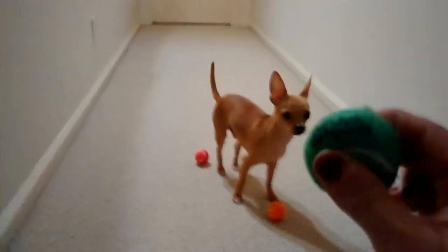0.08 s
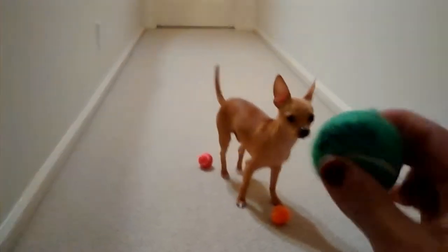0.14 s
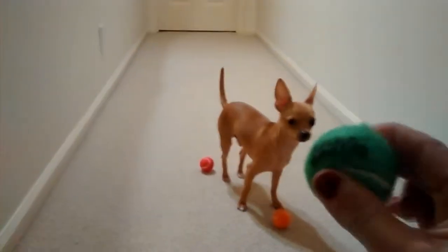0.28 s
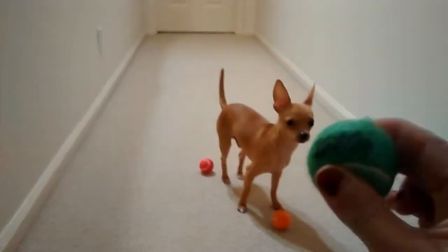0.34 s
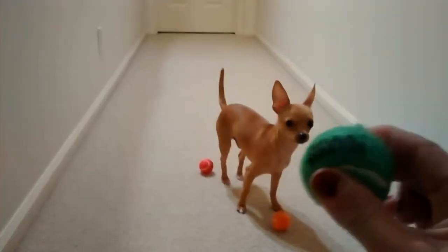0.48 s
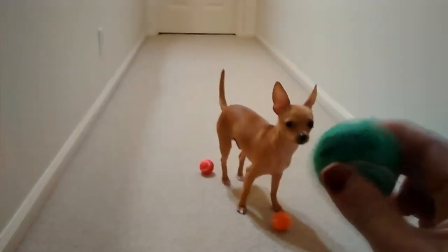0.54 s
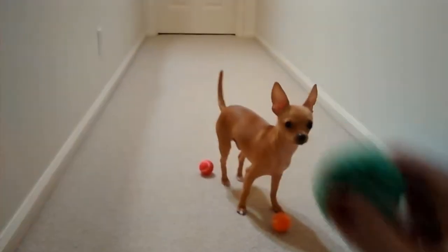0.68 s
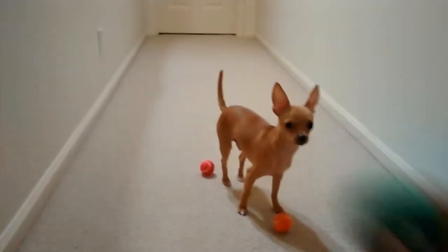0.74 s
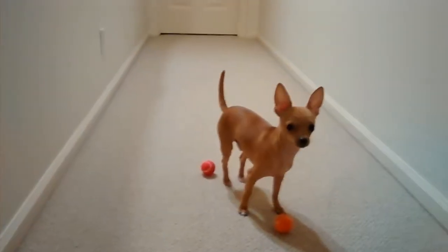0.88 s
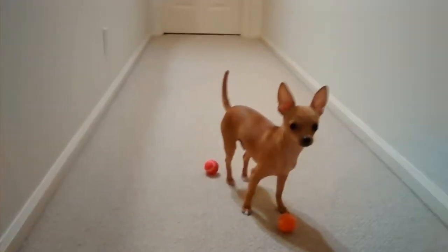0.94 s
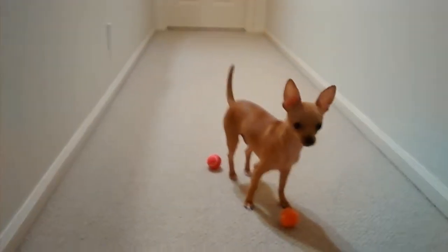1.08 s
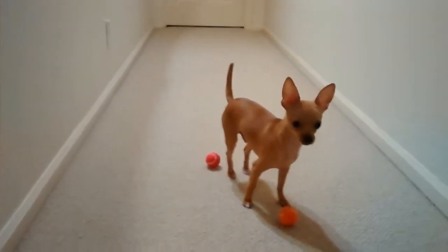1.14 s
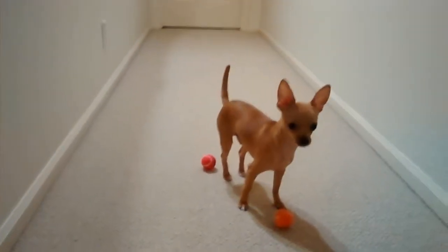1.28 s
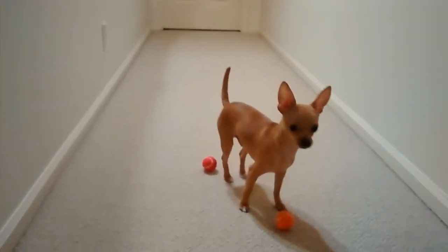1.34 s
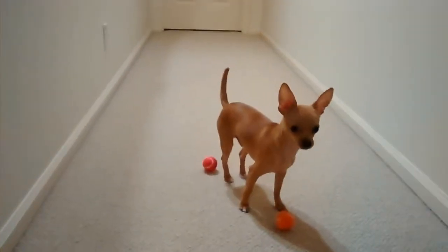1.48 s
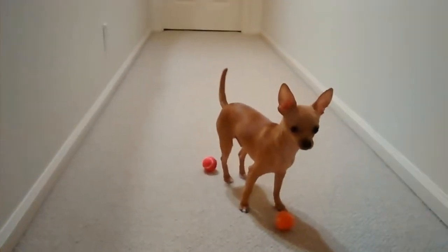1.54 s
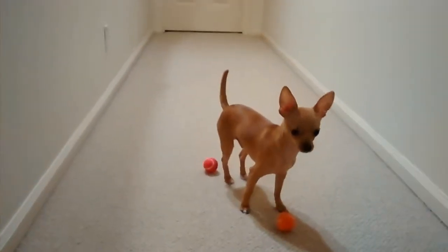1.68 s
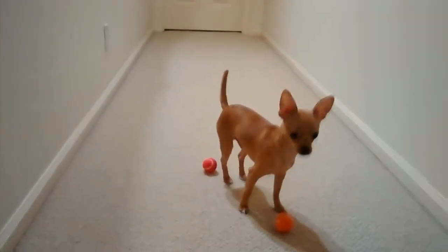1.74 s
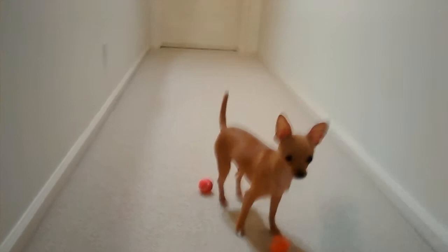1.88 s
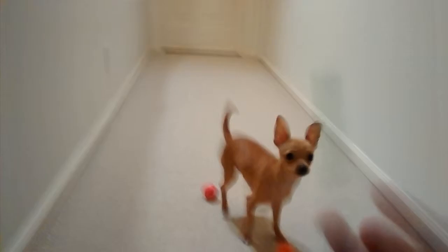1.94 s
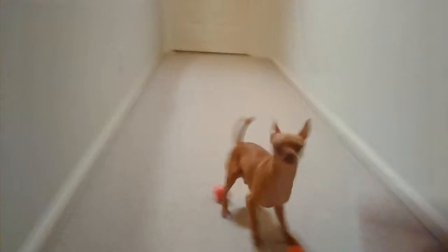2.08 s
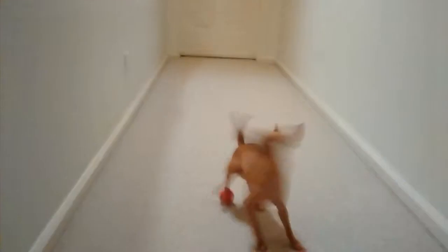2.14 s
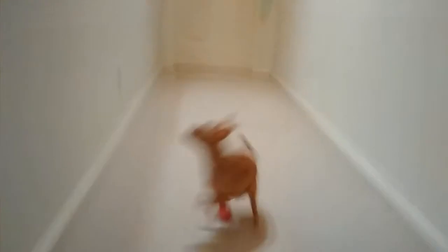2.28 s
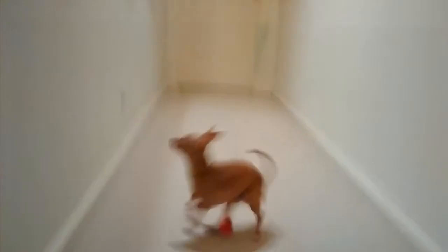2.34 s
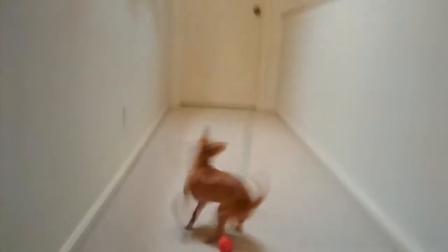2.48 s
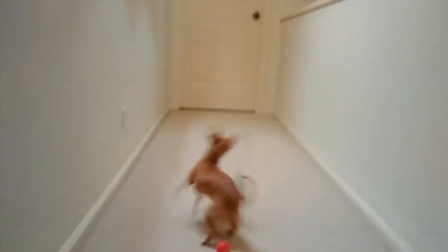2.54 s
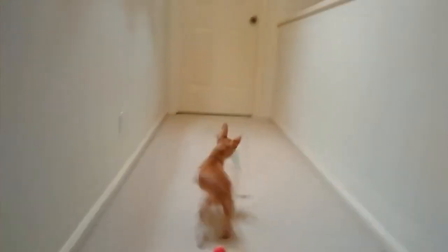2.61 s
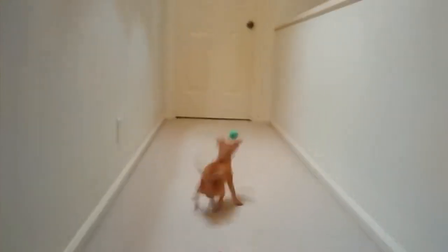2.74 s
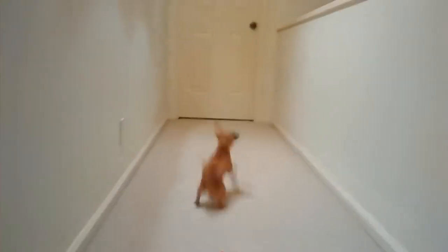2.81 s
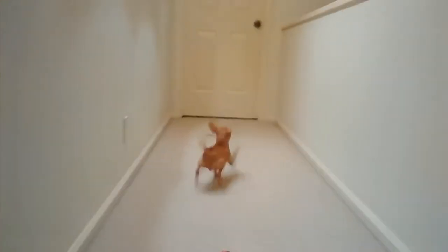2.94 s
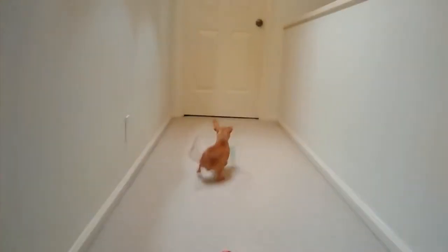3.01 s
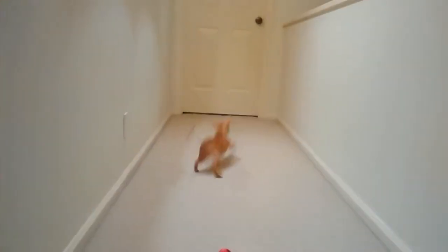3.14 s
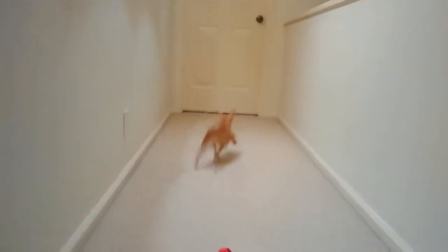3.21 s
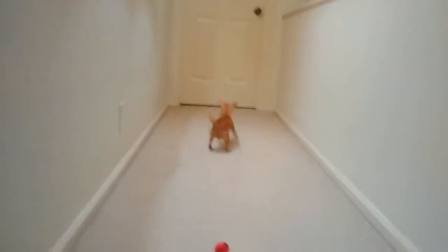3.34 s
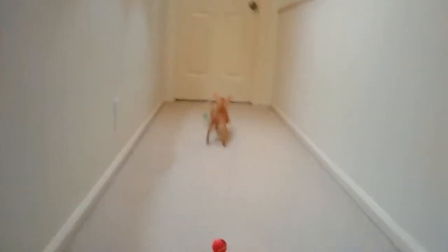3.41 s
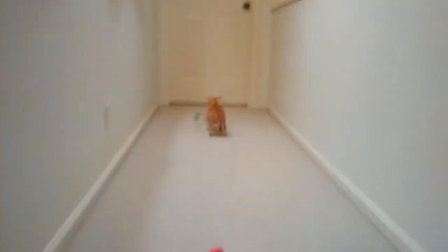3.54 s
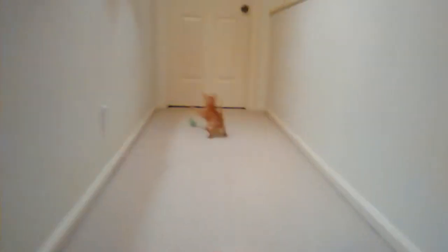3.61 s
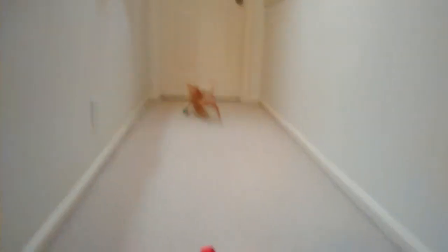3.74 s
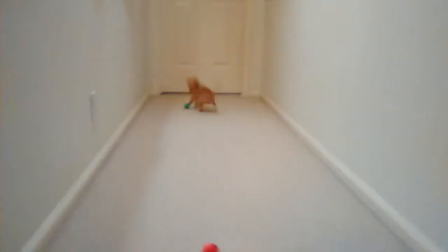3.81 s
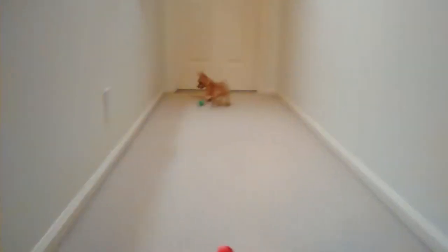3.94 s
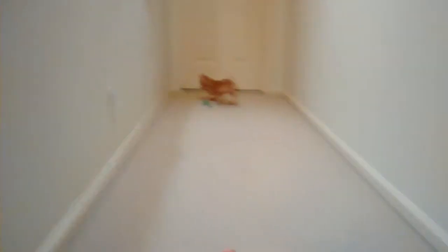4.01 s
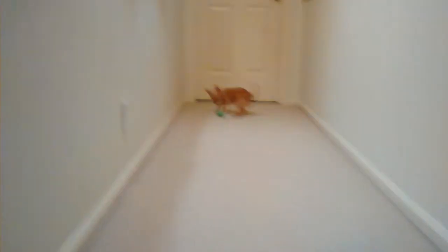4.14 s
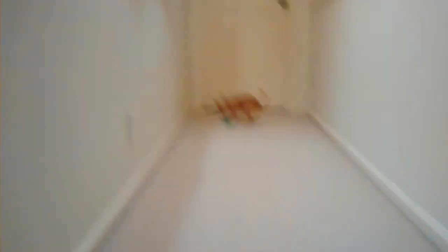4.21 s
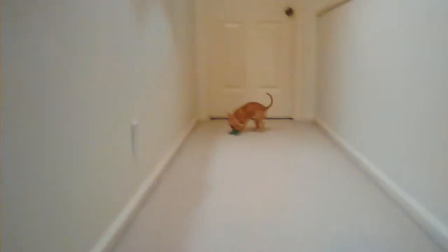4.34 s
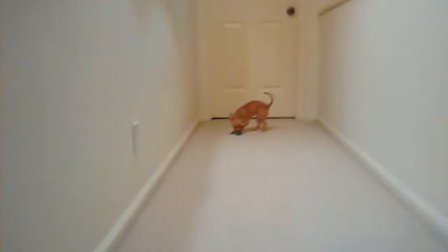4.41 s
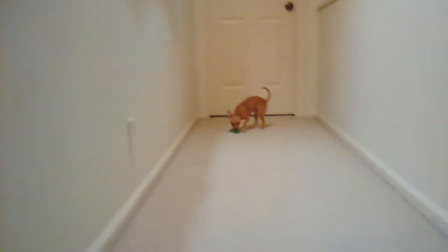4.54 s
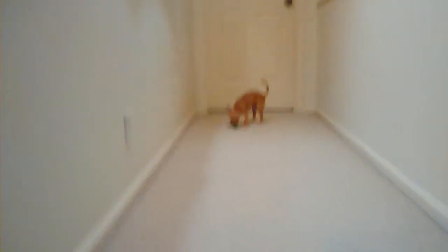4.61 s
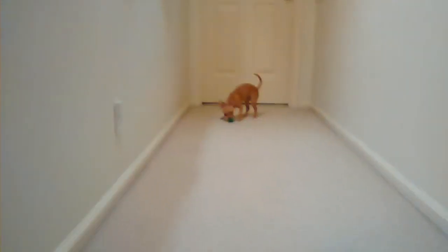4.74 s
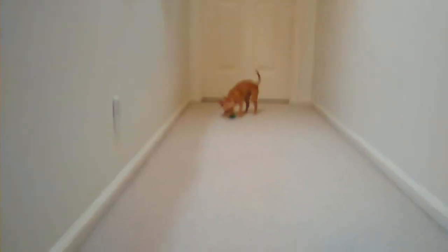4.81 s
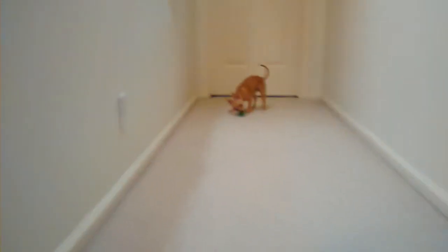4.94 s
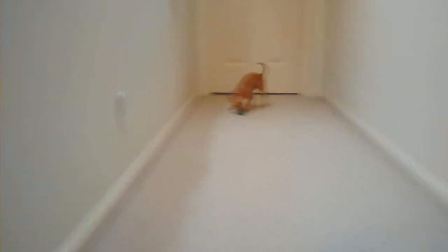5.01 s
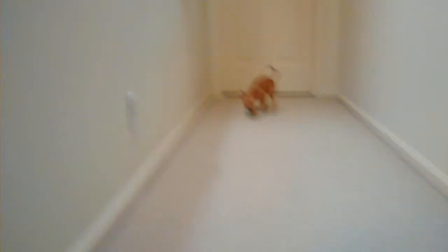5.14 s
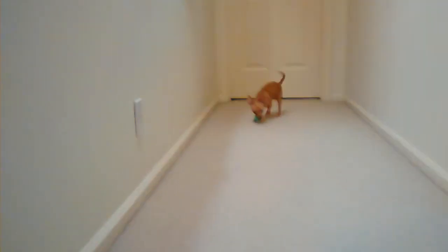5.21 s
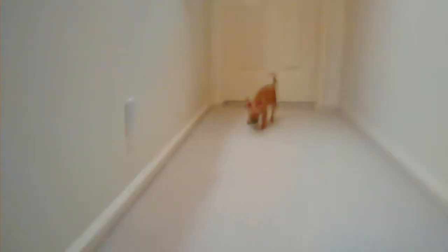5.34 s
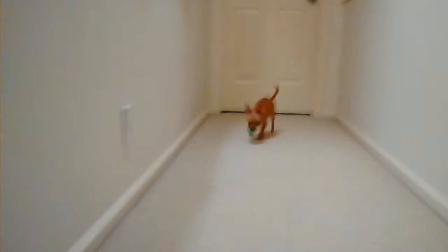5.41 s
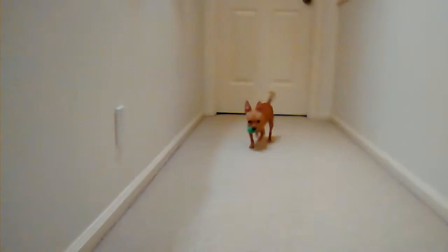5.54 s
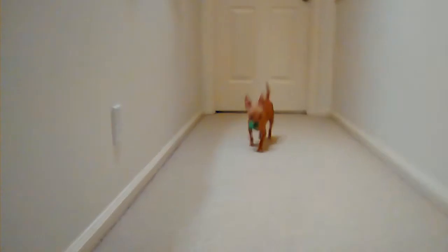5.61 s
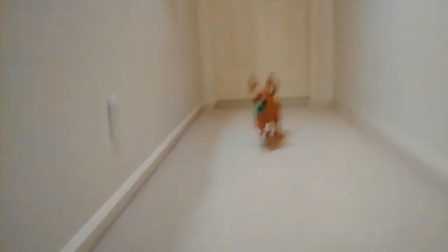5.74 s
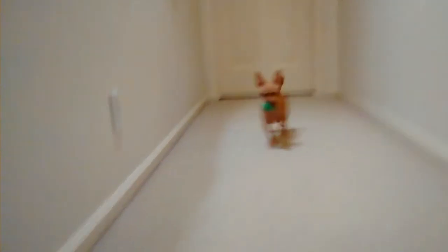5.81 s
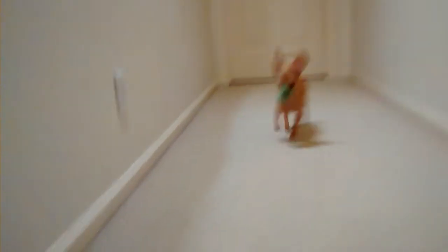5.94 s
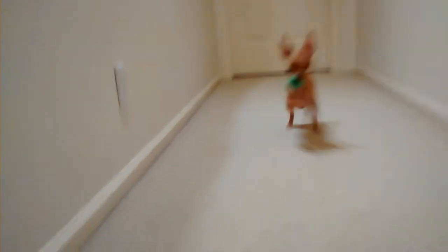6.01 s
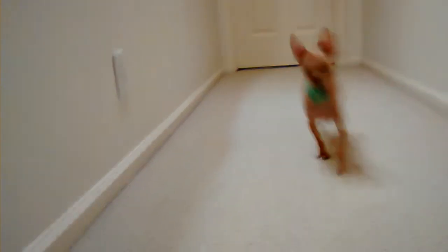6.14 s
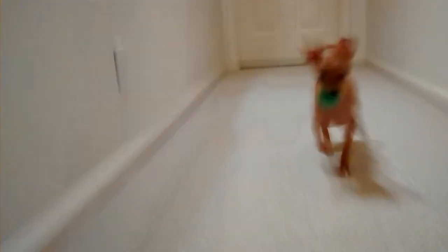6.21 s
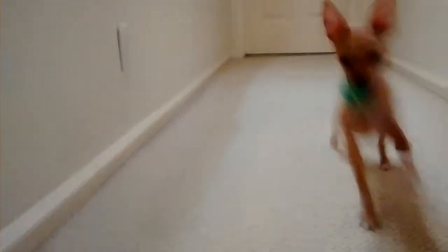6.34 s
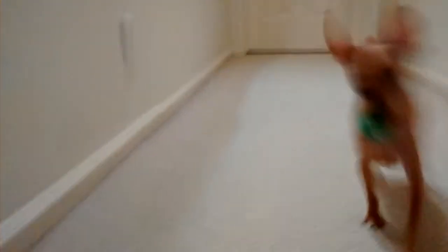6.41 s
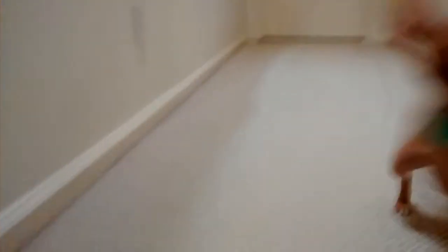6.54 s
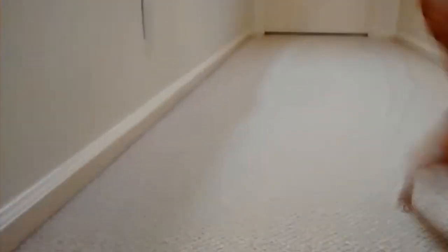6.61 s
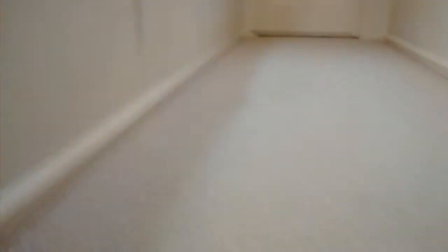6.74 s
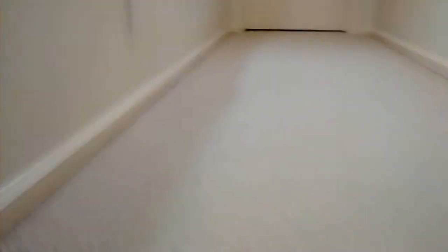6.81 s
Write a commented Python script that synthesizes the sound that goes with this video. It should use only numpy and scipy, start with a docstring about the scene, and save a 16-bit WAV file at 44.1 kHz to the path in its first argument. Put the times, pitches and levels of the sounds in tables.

```python
"""A rubber squeaker is pressed close by in a narrow carpeted corridor; a small dog then bolts away and trots back.
The squeaks are stacked overtones with arching pitch, plus hiss and a puff of air. The paws are low booms,
knocks, slaps and ticks on a hollow floor, with filtered noise for fur and pile. Echoes and a decaying noise
tail make the corridor. Two microphone ports are cross-fed into a widened stereo pair."""
import sys
import numpy as np
from scipy import signal
from scipy.fft import rfft, irfft
from scipy.io import wavfile
from scipy.ndimage import uniform_filter1d

SR = 44100
rng = np.random.default_rng(int(sys.argv[2]) if len(sys.argv) > 2 else 0)


def store_pcm(level_fs):
    """Save levels as 16-bit WAV."""
    pcm = np.round(np.clip(level_fs, -1, 1) * 32767).astype(np.int16)
    wavfile.write(sys.argv[1], SR, np.atleast_2d(pcm).T)


N = 303408
LEAD_IN = 8820   # samples computed ahead of the start, so that earlier sound can ring on into it
TOTAL = N + LEAD_IN

# footfalls and bounces, levels relative within each layer; each layer rescales the rise and ring times:
# (contact_s, rise_s, ring_s, boom_db, boom_hz, knock_db, knock_hz, slap_db)
FOOTFALLS = [(1.995, .006, 0.0068, -47.5, 94, -68, 298, -72),
             (2.247, .028, 0.034, -38.5, 121, -37, 245, -35.5),
             (2.428, 0.023, 0.028, -31, 105, -33, 289, -42),
             (2.53, 0.0087, 0.015, -21.5, 116.5, -43, 298, -65),
             (2.601, .011, 0.0089, -22, 116, -17, 278, -21.5),
             (2.647, .012, 0.0044, -31.5, 120, -28.5, 299, -65),
             (2.716, .01, 0.008, -32.5, 128, -27, 331, -39),
             (2.742, .011, 0.014, -30.5, 143.5, -26.5, 278, -63),
             (2.788, 0.0074, 0.0088, -35.5, 141, -34.5, 262, -65),
             (2.817, .01, 0.022, -36, 116, -36.5, 251.5, -65),
             (2.955, 0.012, 0.027, -20.5, 119, -33, 324, -36.5),
             (3.04, 0.0084, .022, -20.5, 123.4, -22.5, 272, -30),
             (3.1, 0.013, 0.021, -31.5, 107, -40, 280, -61),
             (3.17, 0.0098, 0.012, -29, 126, -21.5, 296, -53),
             (3.209, 0.01, 0.028, -35, 109, -35.5, 286, -65),
             (3.322, 0.0066, 0.018, -31, 122, -35.5, 338, -52),
             (3.351, 0.022, 0.011, -27.5, 106, -55, 300, -65),
             (3.38, 0.011, 0.034, -31.5, 111, -32, 283, -51),
             (3.427, 0.0048, 0.029, -31, 135, -39, 256, -65),
             (3.498, .016, 0.013, -30, 125, -26.5, 269, -39),
             (3.539, 0.0087, 0.018, -27, 131.4, -25.5, 326, -35),
             (3.58, 0.0098, 0.013, -30, 115, -37, 344, -65),
             (3.625, 0.0083, 0.0072, -34, 123.8, -45, 297, -67),
             (3.649, 0.022, 0.033, -31.5, 108, -32, 222, -50),
             (3.703, 0.014, 0.032, -34, 110.6, -56, 260, -70),
             (3.756, 0.0082, 0.019, -26, 128, -22, 257, -46),
             (3.79, 0.0092, 0.039, -22.5, 106.3, -35, 281, -65),
             (3.832, 0.006, 0.036, -32.5, 104, -42.5, 421, -65),
             (3.923, 0.0078, 0.017, -30, 110, -34.5, 367, -27.5),
             (3.977, 0.0096, 0.016, -32.5, 114.6, -33, 310, -31.5),
             (4.017, 0.011, 0.019, -42, 139, -36, 303, -65), (4.049, .016, 0.012, -41, 116, -40, 1107, -22),
             (4.112, 0.0077, 0.013, -43, 90, -43.5, 360, -65),
             (4.188, .008, 0.019, -34.5, 120, -44.5, 263, -65),
             (4.268, .009, 0.0045, -46.5, 101, -44.5, 312, -37),
             (4.352, 0.0099, 0.026, -47, 98, -46.5, 342.5, -40),
             (4.454, 0.0056, 0.0057, -47, 119, -48.5, 305, -72),
             (4.686, 0.025, 0.022, -49.5, 104, -59, 305, -70),
             (5.004, 0.0082, 0.016, -44.5, 98, -58.5, 302, -68.5),
             (5.049, 0.007, 0.0078, -46, 69.5, -62, 300, -70.5),
             (5.22, 0.0072, 0.0099, -42, 109, -45, 291, -64),
             (5.267, .009, 0.037, -43.5, 96, -64, 297, -70),
             (5.371, .016, 0.027, -40, 106.4, -44, 296, -65),
             (5.421, 0.0081, 0.034, -45, 105, -55, 422, -33.5),
             (5.471, 0.0094, 0.03, -46.5, 96, -51, 310, -70),
             (5.543, .011, 0.015, -42, 97, -35.5, 327, -60),
             (5.575, 0.014, 0.04, -35.5, 103, -49, 296, -59),
             (5.669, 0.014, .016, -28.5, 111, -37.5, 353, -58),
             (5.712, 0.0087, 0.017, -33.5, 105, -46, 345, -68),
             (5.757, .012, 0.016, -43, 108, -46.5, 422, -70),
             (5.837, 0.013, 0.025, -31.5, 119.5, -40, 350, -58),
             (5.873, 0.011, 0.022, -31.5, 103, -46.5, 334, -40),
             (5.941, .01, .018, -31.5, 109, -32.5, 365, -50),
             (5.977, 0.011, 0.021, -33, 117, -44, 360, -70), (6.026, 0.008, 0.017, -29, 98, -47, 390, -65),
             (6.068, 0.013, 0.015, -35.5, 126, -37.5, 333, -65),
             (6.109, 0.0067, 0.015, -34, 118, -48, 470, -65),
             (6.159, .01, 0.031, -28.5, 110, -38, 349, -60),
             (6.181, 0.015, 0.012, -28.5, 109, -50, 340, -70),
             (6.224, 0.0085, 0.0096, -27, 107, -35.5, 333, -55),
             (6.24, 0.018, 0.02, -26, 111, -45, 330, -70), (6.295, 0.013, 0.014, -30, 107, -41.5, 440, -65),
             (6.353, 0.0088, 0.01, -30, 120.4, -32, 320, -36),
             (6.369, 0.012, 0.033, -31.5, 117.4, -46, 332, -70),
             (6.418, 0.0097, 0.034, -25, 86.7, -38, 356, -58),
             (6.5, 0.014, 0.045, -24, 85.6, -44, 353, -65), (6.587, 0.0082, 0.019, -30, 84, -41, 397, -70),
             (6.61, .006, 0.029, -24.5, 92.7, -39, 330, -54),
             (6.656, 0.0093, 0.014, -41, 96, -42, 356, -70),
             (6.721, 0.0054, 0.019, -42, 91, -50, 374, -30.5),
             (6.759, 0.00344, 0.0044, -34, 90.5, -24.5, 414, -46),
             (6.807, .011, 0.035, -33.5, 87, -44.5, 417, -65)]


def amp(db):
    """Decibels to gain."""
    return 10 ** (np.asarray(db) / 20)


def rms_one(x):
    """Scale to unit rms."""
    return x / np.sqrt(np.mean(x ** 2) + 1e-20)


def at_hz(points, hz):
    """Read a table of values against Hz on a log-frequency axis."""
    table_hz, values = np.array(points).T
    return np.interp(np.log(hz + 1), np.log(table_hz), values)


def shaped(x, points):
    """Colour by a table of dB against Hz."""
    hz = np.fft.rfftfreq(x.shape[-1], 1 / SR)
    return irfft(rfft(x) * amp(at_hz(points, hz)), x.shape[-1])


def band(x, low_hz, high_hz):
    """Keep only the sound between two frequencies."""
    return signal.sosfilt(signal.butter(2, [low_hz, high_hz], "band", fs=SR, output="sos"), x)


def add(track, s, sound):
    """Mix a sound into a track at a time in seconds."""
    i = LEAD_IN + round(s * SR)
    track[i:i + len(sound)] += sound[:TOTAL - i]


def clock():
    """Time of every sample in seconds, negative during the lead-in."""
    return np.arange(TOTAL) / SR - LEAD_IN / SR


def diffuse(length, likeness=None):
    """White noise from all around: the two ports hear it alike in the bass, less so higher up."""
    # diffuse sound at the two ports: (pitch_hz, likeness from 0 to 1)
    usual_likeness = [(60, .995), (250, .99), (500, .95), (1000, .6), (2000, 0.24), (16000, .0)]
    points = usual_likeness if likeness is None else likeness
    alike = np.clip(at_hz(points, np.fft.rfftfreq(length, 1 / SR)), 0, 1)
    mid, side = rfft(rng.standard_normal((2, length)))
    ports = np.sqrt(1 + alike) * mid + np.sqrt(1 - alike) * side * [[1], [-1]]
    return irfft(ports / np.sqrt(2), length)


def room_tone():
    """Steady room tone and self-noise: coloured noise, alike at the ports only in the bass."""
    # colour of the noise: (pitch_hz, relative_level_db)
    colour = [(20, -6.5), (40, 0), (55, 10), (75, -5.5), (300, -13), (600, -16), (1000, -26.5), (2500, -27),
              (6000, -28.5), (16000, -30.5)]
    # how alike it is at the ports: (pitch_hz, likeness from 0 to 1)
    likeness = [(20, 0.94), (55, 0.88), (120, 0.19), (16000, .0)]
    return amp(-51.5) * rms_one(shaped(diffuse(TOTAL, likeness), colour))


def squeeze(s, length, top_hz, level_db, top, low_start, low_end):
    """Pressure rises fast and leaks away: pitch arches, level speaks, holds, fades and stops."""
    sag_shape = 1.7   # how round the pitch arch is
    u = np.linspace(0, 1, num=40)   # share of the squeeze gone by
    climb = np.clip(1 - u / top, 0, 1)
    sag = np.clip((u - top) / (1 - top), 0, 1)
    lost = low_start * climb ** sag_shape + low_end * np.sin(np.pi * sag / 2) ** sag_shape
    db = np.interp(u, [0, 0.091, 0.46, 0.93, 1], [-15, -1.2, -1.5, -12, -26])
    return np.transpose([s + u * length, top_hz * (1 - lost), level_db + db])


def squeak(rows, dull_db):
    """The reed pitch follows the air pressure; its overtones and hiss differ at each port."""
    # strength of each overtone: (multiple of the pitch, relative_level_db)
    overtones = [(1, -0.5), (2, -0.5), (3, -6), (4, -13), (5, -8.5), (6, -11.5), (7, -11), (8, -17.5),
                 (9, -16.5), (10, -12.5), (11, -24)]
    # the toy is shaded from the right port: (pitch_hz, left_over_right_db)
    shading = [(1000, 5.5), (2000, 0.5), (3500, 7), (5000, 6.5), (7000, 10.5), (12000, 14.5)]
    # colour of the squeaker's mouth: (pitch_hz, gain_db)
    mouth = [(1000, 0.5), (6500, 7), (8000, -9), (10500, 1), (15000, -13.5)]
    t = clock()
    s, hz, level_db = np.transpose(rows)
    on = (t > s[0]) & (t < s[-1])
    t = t[on]
    pitch = uniform_filter1d(np.interp(t, s, hz), size=200)
    flutter = rms_one(band(rng.standard_normal(len(t)), 150, 900))
    pitch = pitch * (1 + .006 * flutter)   # the reed flutters
    level = uniform_filter1d(np.interp(t, s, amp(2 * level_db)) ** .5, size=40)
    level = level * np.clip(np.minimum(t - t[0], t[-1] - t) / 0.00021, 0, 1)   # no click at the ends

    phase = 2 * np.pi * np.cumsum(pitch) / SR
    out = np.zeros((2, TOTAL))
    for k, order_db in overtones:
        gain_db = order_db - 3.5 + at_hz(mouth, k * pitch) - dull_db * (k - 1)
        gain_db = gain_db - at_hz(shading, k * pitch) * [[0], [1]]
        lag = 2 * np.pi * k * pitch * [[0], [.00003]]   # 0.03 ms later at the right port
        audible = k * pitch < .45 * SR
        out[:, on] += amp(gain_db) * np.sin(k * phase + 1.6 * k - lag) * audible
    # air past the reed, puffed each cycle
    hiss = band(rng.standard_normal((2, len(t))), 2000, 16000) * (1 + np.sin(phase))
    out[:, on] += amp(np.array([[-25], [-31]]) - dull_db) * hiss
    out[:, on] *= level
    # the first gust of air
    puff = band(rng.standard_normal(len(t)), 250, 1000) * np.exp(-(t - t[0]) / 0.0034)
    out[:, on] += amp(max(level_db) - 18.0) * puff
    return out


def corridor(x):
    """Side-wall and far echoes, then dense reflections dying band by band; the first are brighter."""
    # time to die away by 60 dB: (pitch_hz, t60_s)
    decay = [(60, 0.9), (300, 1), (1500, 0.58), (4000, 0.43), (8000, .32), (14000, .15)]
    # scattered echoes: (delay_s, left_gain, right_gain, dulled_above_hz, scattered_over_s)
    echoes = [(.0035, -0.33, 0.1, 12000, 0.000093), (.007, -0.68, 0.63, 9000, 0.00029),
              (0.024, 0.65, 0.41, 2200, .008)]
    t = np.arange(round(.5 * SR)) / SR
    tail = 0
    edges = 40 * 2.0 ** np.arange(9.5)   # octave bands
    noise = diffuse(len(t))
    for low, high in zip(edges, np.minimum(edges[1:], .45 * SR)):
        dying = amp(-60 * t / at_hz(decay, np.sqrt(low * high)))
        early_bright = 1 + (high / 3800.0) ** 1.5 * np.exp(-t / .022)
        tail = tail + band(noise, low, high) * dying * early_bright
    tail = tail * np.clip(t / 0.003, 0, 1)
    tail = tail / np.sqrt(np.sum(tail ** 2) / 2)
    for s, left, right, cut_hz, spread in echoes:
        scatter = rng.standard_normal(len(t)) * np.exp(-((t - s) / spread) ** 2)
        scatter = band(scatter + 1e-18, 600, cut_hz)
        scatter = scatter / np.sqrt(np.sum(scatter ** 2)) * np.sqrt(cut_hz / SR * 2)
        tail += np.outer([left, right], scatter)
    return signal.fftconvolve(x[None], tail, axes=1)[:, :TOTAL]


def swell(rise, fall):
    """A smooth rise to a rounded peak at time 0, then a steady fall in dB, faded out."""
    t = np.arange(round((2 * rise + 4 * fall) * SR)) / SR - 2 * rise
    after = np.maximum(t, 0) / fall
    up = np.cos(np.pi * np.minimum(t, 0) / (4 * rise)) ** 2
    down = amp(-9.0 * (np.hypot(.4, after) - .4)) * np.cos(np.pi * after / 8)
    return t, up * down


def brush():
    """Fur and pile rub and paws skid: dense fibre noise in uneven grains, a dull and a bright part."""
    # steady rustle as the dog moves: (time_s, relative_level_db, brightness_db)
    rustle = [(1.8, -65, 1), (2.4, -63, -8), (3, -63, -4), (3.5, -67.5, -2.5), (4.001, -55, -11),
              (4.299, -60, -25), (4.9, -62, -10), (5.3, -66.5, -6), (5.42, -60.5, 1), (5.49, -48, -4.5),
              (5.798, -47, -4), (6.19, -38.5, -7), (6.58, -42.5, -26), (6.651, -54, -2), (6.79, -41, -5.5),
              (6.88, -34.5, -12)]
    # paws skidding over the pile: (peak_s, relative_level_db, brightness_db, rise_s, fall_s)
    skids = [(2.082, -65, 21.5, 0.0026, 0.0044), (2.14, -59, -19, .03, 0.036),
             (2.285, -47.5, -12, 0.029, 0.032), (2.44, -54, -4, 0.042, 0.065), (2.61, -70, -20, .008, .06),
             (2.75, -67, 13, 0.0079, 0.025), (3.042, -53.5, -22, 0.0055, 0.054),
             (3.19, -44.5, -3, 0.025, 0.046), (3.244, -54, 1.5, 0.01, 0.039), (3.55, -65, 3, 0.05, 0.026),
             (3.871, -52, -6, 0.029, 0.071), (4.066, -45.5, -29, 0.023, 0.041),
             (4.76, -62, -21, 0.051, 0.092), (5.338, -60, -4, .04, 0.0085), (6.868, -36, -25, .006, 0.0085)]
    s, level_db, bright_db = np.transpose(rustle)
    t = clock()
    low = amp(np.interp(t, s, level_db, left=-99))
    high = low * amp(np.interp(t, s, bright_db))
    for peak_s, skid_db, skid_bright_db, rise, fall in skids:
        after, shape = swell(rise, fall)
        add(low, peak_s + after[0], amp(skid_db) * shape)
        add(high, peak_s + after[0], amp(skid_db + skid_bright_db) * shape)
    grain = amp(1.3 * rms_one(band(rng.standard_normal(TOTAL), 24, 180)))
    dull = rms_one(band(diffuse(TOTAL), 480, 3400))
    fibres = diffuse(TOTAL)
    crisp = rms_one(band(fibres, 3100, 11000)) * amp([[2], [-2]])   # stronger on the left
    bright = rms_one(band(fibres, 1700, 4600)) + amp(-12.0) * crisp
    return grain * (amp(-8.5) * low * dull + amp(-5.0) * high * bright)


def ticks():
    """Claws and joints tick: each is a click whose ringing dies in about a millisecond or less."""
    # (time_s, relative_level_db, ring_hz, ring_s)
    clicks = [(1.853, -46, 704, 0.0012), (2.0822, -27.5, 3860, 0.00052), (2.405, -45, 12130, 0.00021),
              (5.3885, -30.5, 10510, .0001), (6.8646, -17.5, 1670, 0.00098), (6.864, -27.5, 3560, 0.0016),
              (6.870, -29, 3450, 0.0019)]
    out, t = np.zeros(TOTAL), np.arange(300) / SR
    for s, level_db, hz, ring in clicks:
        add(out, s, amp(level_db) * np.exp(-t / ring) * np.sin(2 * np.pi * hz * t))
    return out


def knocks():
    """Each paw lands in a burst of uneven little contacts, heard around a centre pitch."""
    out = np.zeros(TOTAL)
    width = 1.164   # upper band edge as a multiple of the centre pitch
    for s, rise, ring, _, _, level_db, hz, _ in FOOTFALLS:
        t, shape = swell(.6 * rise, 1.48 * ring)
        grit = rng.standard_normal(len(t) + 800)   # 800 extra samples let the filter settle
        body = rms_one(band(grit, hz / width / 1.227, hz * width))[-len(t):]
        # the firm note of the contact, starting at a random phase
        body = body + 0.57 * np.cos(2 * np.pi * hz * t + 9.84 * grit[0])
        add(out, s + .8 * rise + t[0], amp(level_db - 0.5) * shape * body)
    return out


def slaps():
    """Paws slap the floor: sudden dull noise, strongest at the start, that dies at once."""
    hits, t = np.zeros(TOTAL), np.arange(6000) / SR
    t60_s = 0.055
    for s, *_, level_db in FOOTFALLS:
        burst = rng.standard_normal(len(t)) * (1 + 0.9 * np.exp(-t / 0.0017))
        add(hits, s, amp(level_db - 60 * t / t60_s) * burst)
    return amp(-6.5) * band(hits, 400, 1070)


def thuds():
    """Each footfall swings the boards for a few cycles, with a rumble of neighbouring modes."""
    lag_s, rise_share = 0.00313, 0.58   # the boards peak this long after the rise, swelling in a share of it
    out, rumble = np.zeros(TOTAL), np.zeros(TOTAL)
    for s, rise, ring, level_db, hz, *_ in FOOTFALLS:
        t, shape = swell(rise_share * rise, ring)
        start = s + rise + lag_s + t[0]
        swing = np.cos(2 * np.pi * (hz * t + rng.random()))
        add(out, start, amp(level_db + 10) * shape * swing)
        add(rumble, start, amp(level_db) * shape)
    modes = rms_one(band(rng.standard_normal(TOTAL), 72.2, 166))
    joists = rms_one(band(rng.standard_normal(TOTAL), 36, 65))   # slow heave under the boom
    return out + amp(-8.5) * rumble * modes + amp(-11.5) * rumble * joists


def scene():
    """Sound at the two ports: direct sources, their reverberation and the room tone."""
    # squeezes; the first ends before the start, so only its reverberation is heard:
    # (start_s, length_s, top_pitch_hz, relative_level_db, moment of top as share of length,
    #  pitch share lost at the start, pitch share lost at the end, extra_loss_db per overtone)
    squeezes = [(-.1, 0.076, 2258, -14, .45, .36, .36, -1),
                (.19, 0.043, 1915, -12.5, 0.23, 0.3, 0.3, -0.37),
                (.299, 0.027, 1920, -32, 0.21, 0.31, 0.073, 6),
                (0.392, 0.017, 1533, -33, 0.97, 0.094, .01, 12.5),
                (.594, 0.037, 1859, -12, .28, 0.22, 0.29, -0.28),
                (0.795, .046, 1776, -12.5, .33, 0.16, 0.23, -1.5)]
    early, *heard = [squeak(squeeze(*row), dull_db) for *row, dull_db in squeezes]
    toy = sum(heard)
    boom = thuds()
    paws = knocks() + slaps() + ticks()
    wet = amp(-9.5) * (toy + early)[0] + amp(-10.5) * boom + amp(-2.5) * paws
    near = boom * amp([[1.7], [0]]) + paws * amp([[1.8], [-1.3]])   # a little louder on the left
    return (toy + near + brush() + corridor(wet) + room_tone())[:, LEAD_IN:]


def record(dry):
    """Each port loses a delayed, coloured copy of the other, which widens the image; the top is cut."""
    # share of the other port taken away from the left: (pitch_hz, share)
    cross_left = [(100, .65), (1200, .62), (2500, .6), (3700, .3), (5000, .15), (6200, .35), (7600, .5),
                  (16000, .2)]
    # and from the right: (pitch_hz, share)
    cross_right = [(100, .65), (1200, .72), (2500, .92), (3700, .85), (5000, .4), (6200, .1), (7600, .2),
                   (16000, .05)]
    delay_s, cutoff_hz = .000408, 16150   # the filter is 60 dB down from the cutoff upwards
    hz = np.fft.rfftfreq(N, 1 / SR)
    shares = np.array([at_hz(cross_left, hz), at_hz(cross_right, hz)])
    cross = shares * np.exp(-2j * np.pi * hz * delay_s)
    wide = dry - irfft(rfft(dry[::-1]) * cross, N)
    return signal.sosfilt(signal.cheby2(14, 60, cutoff_hz, fs=SR, output="sos"), wide)


dry = scene()
out = record(dry)
store_pcm(out)
```